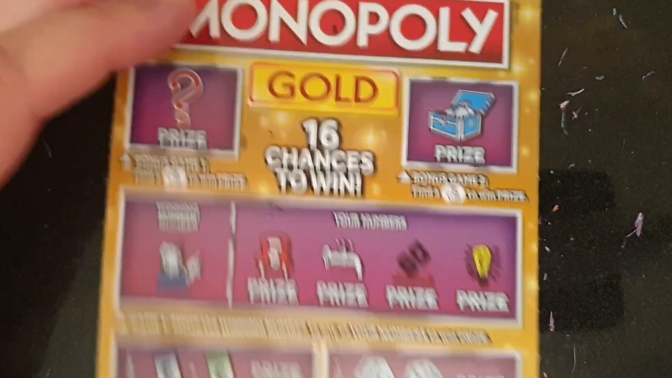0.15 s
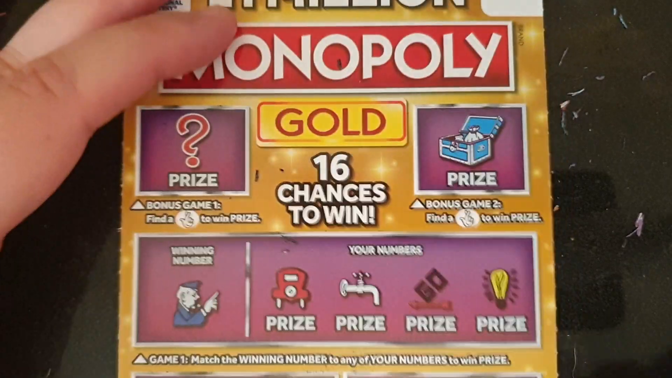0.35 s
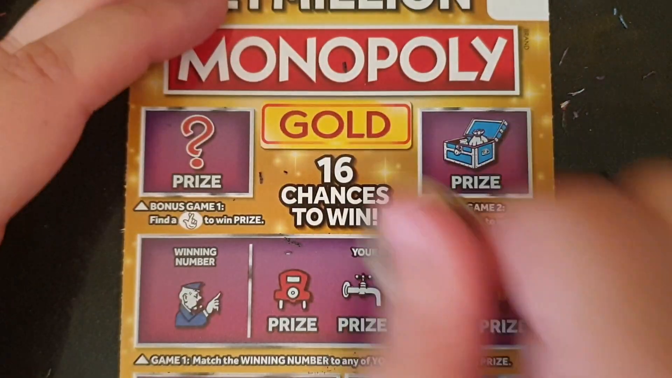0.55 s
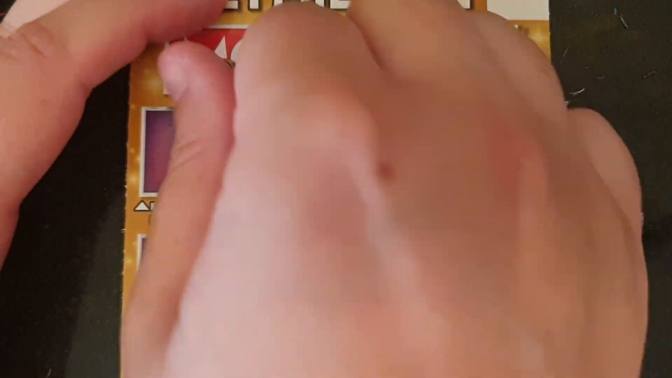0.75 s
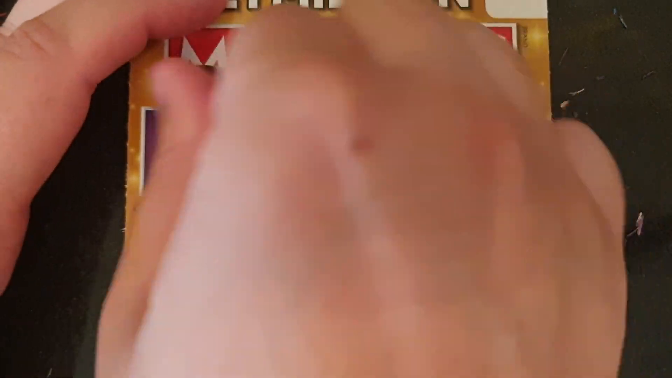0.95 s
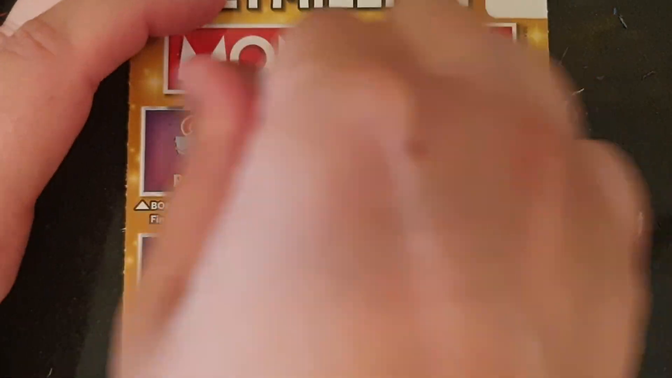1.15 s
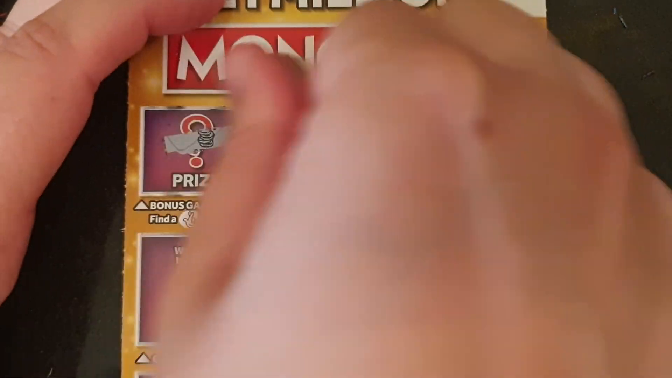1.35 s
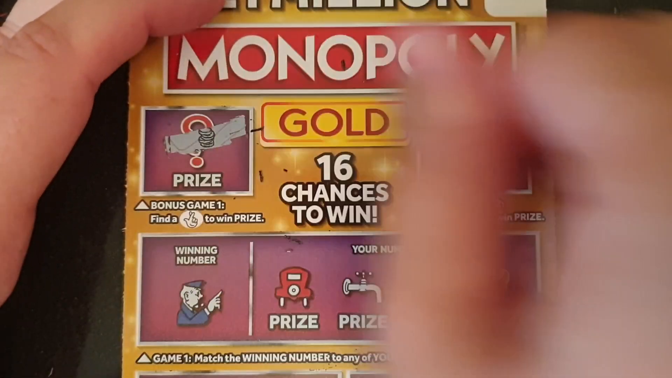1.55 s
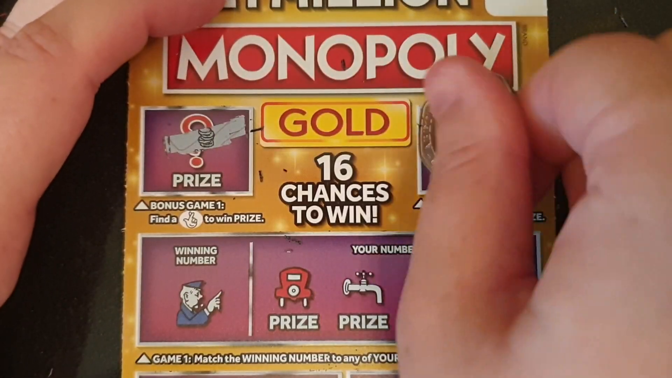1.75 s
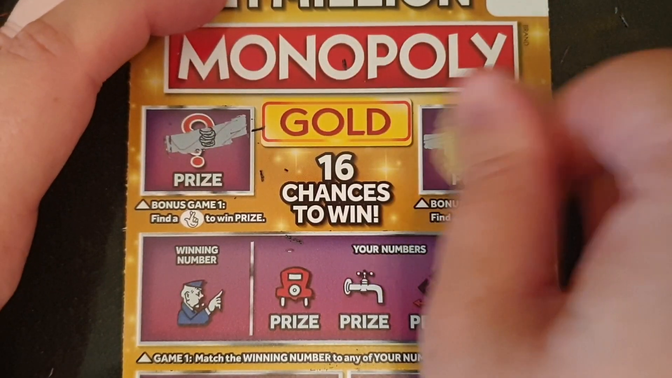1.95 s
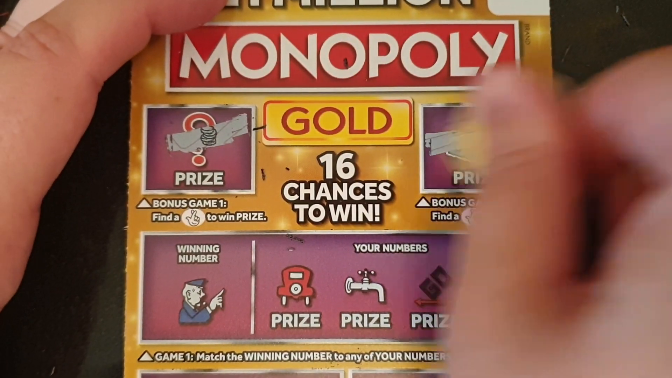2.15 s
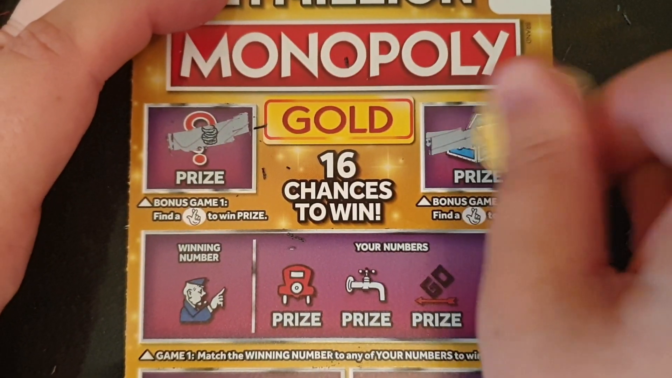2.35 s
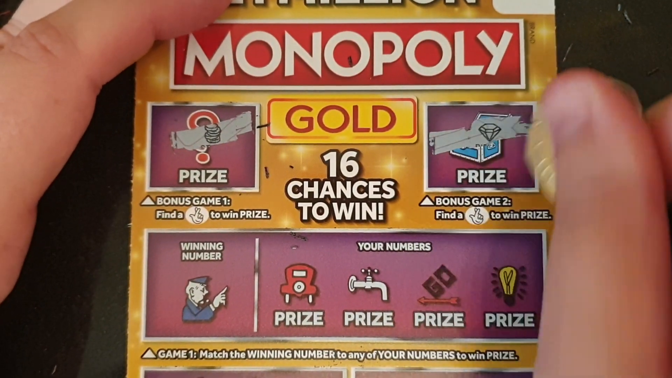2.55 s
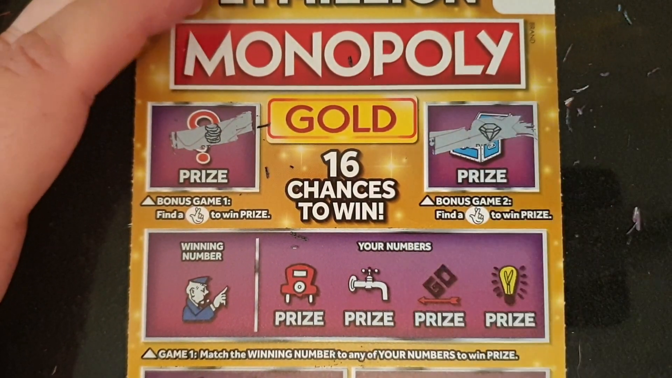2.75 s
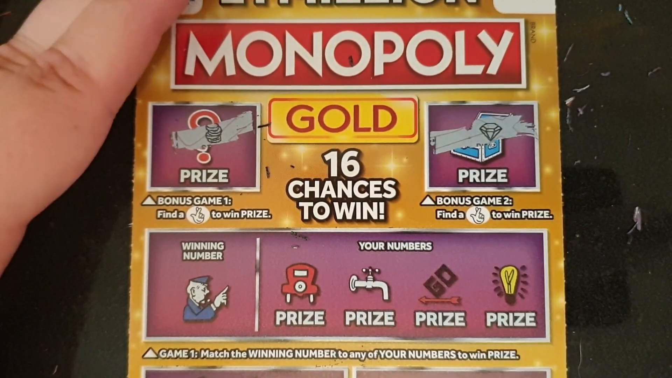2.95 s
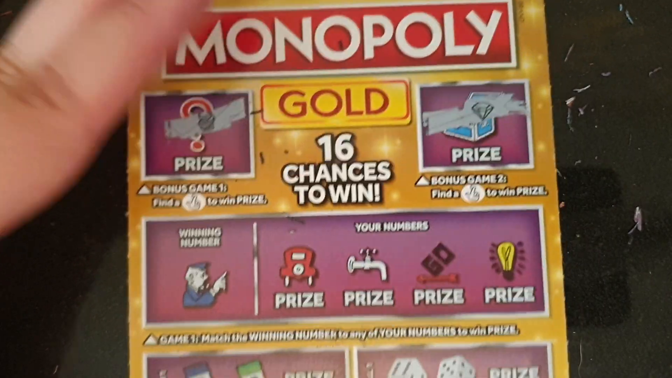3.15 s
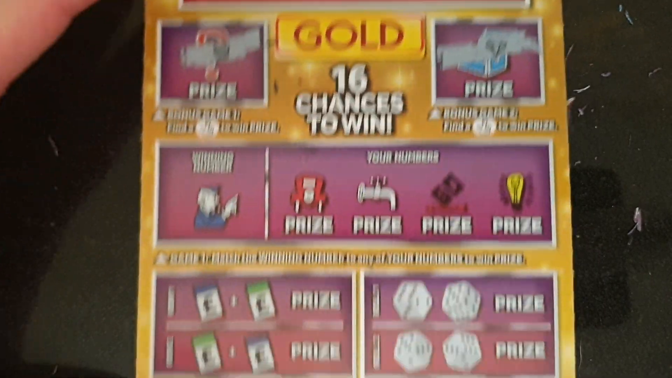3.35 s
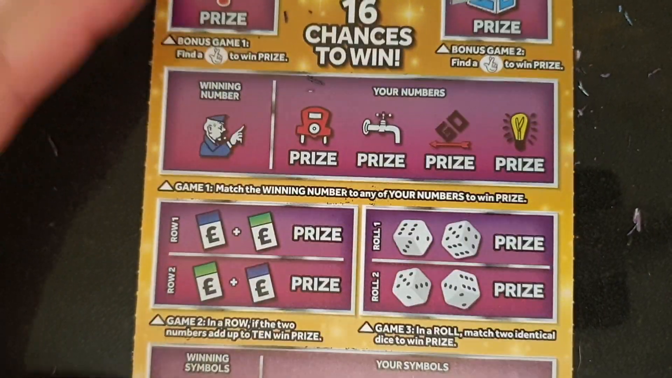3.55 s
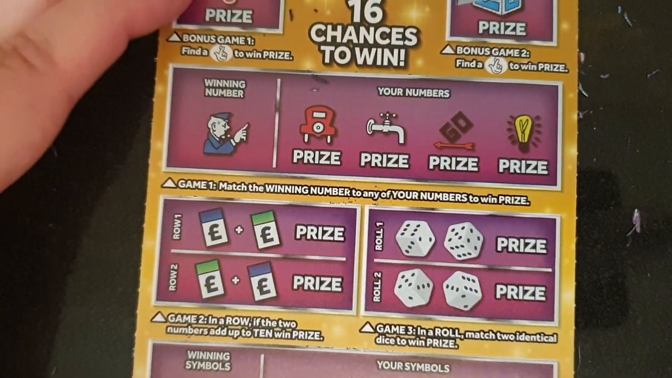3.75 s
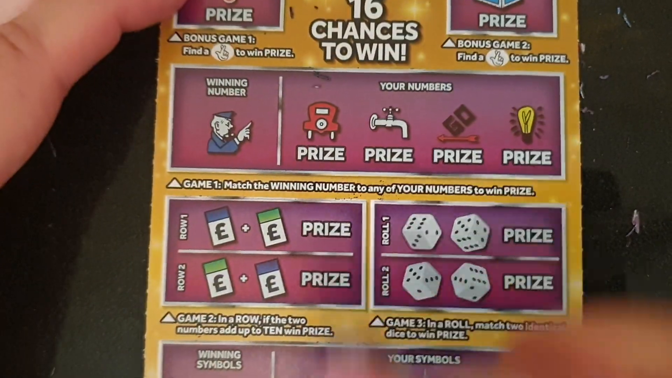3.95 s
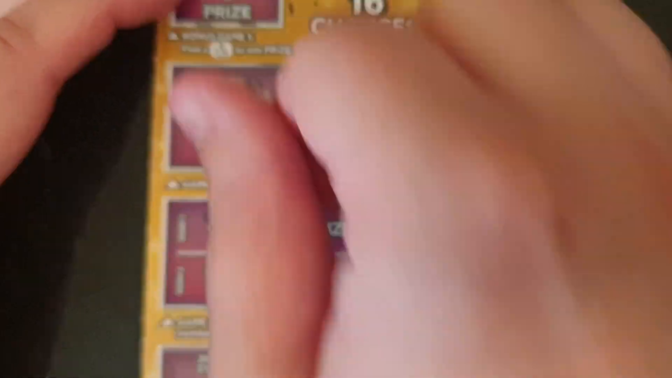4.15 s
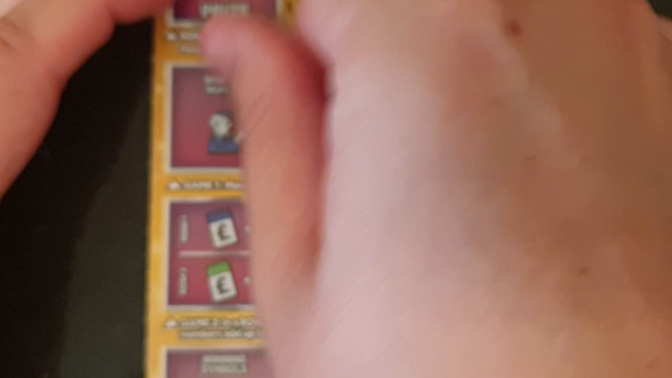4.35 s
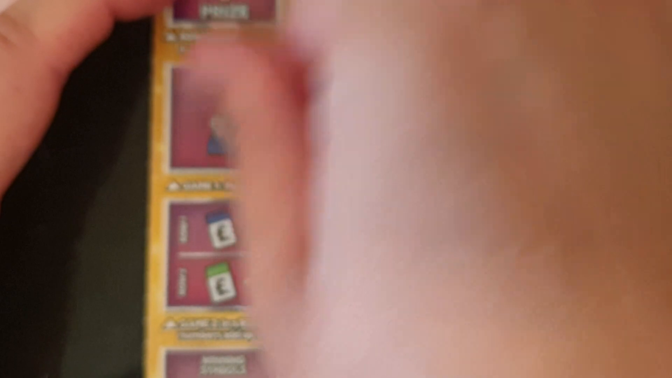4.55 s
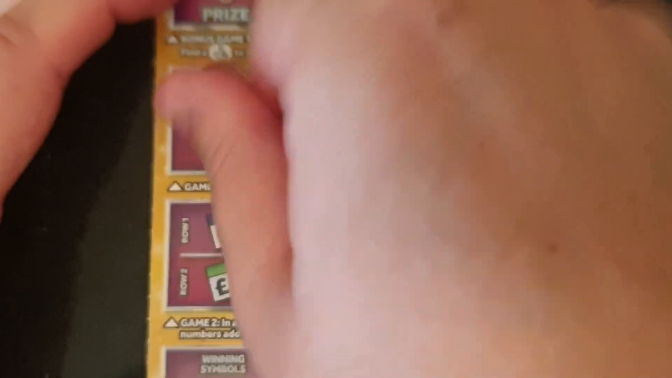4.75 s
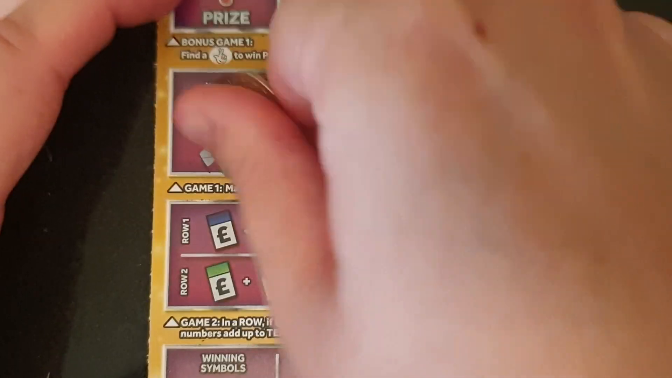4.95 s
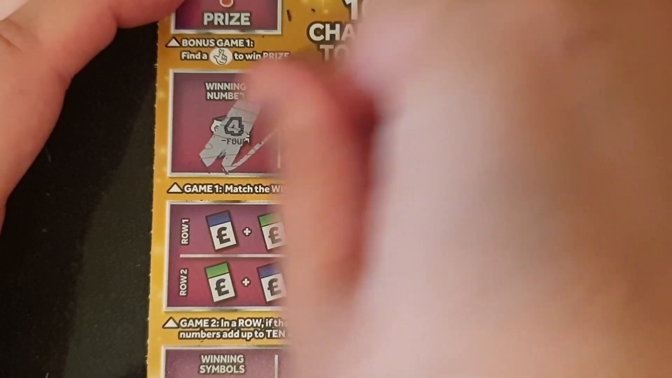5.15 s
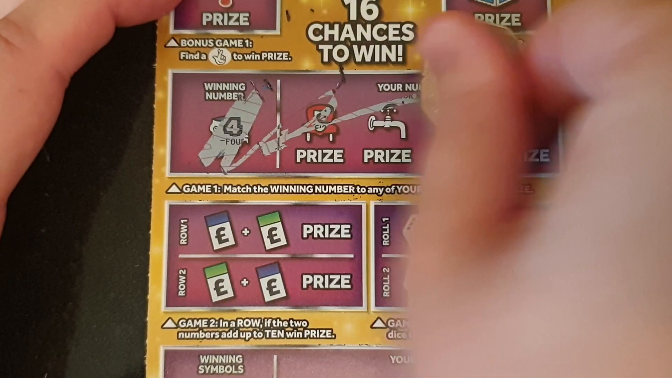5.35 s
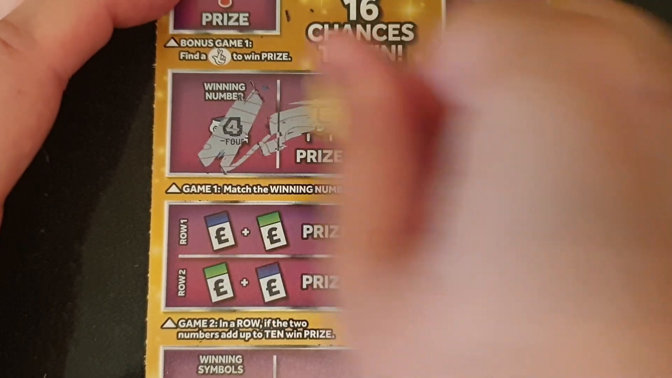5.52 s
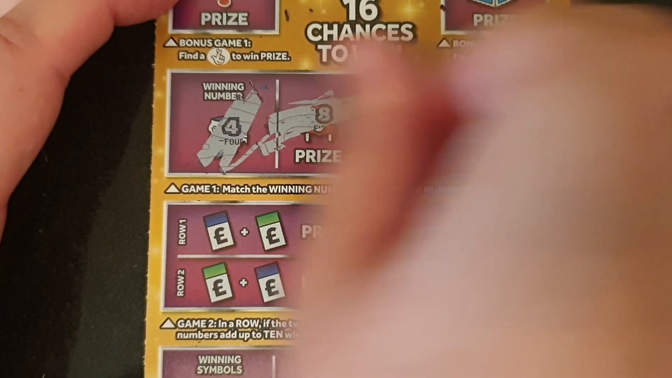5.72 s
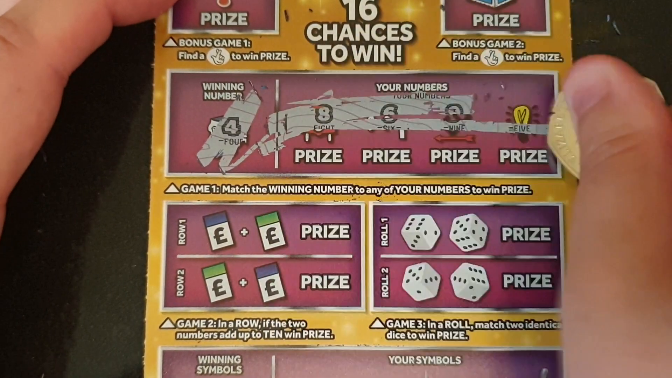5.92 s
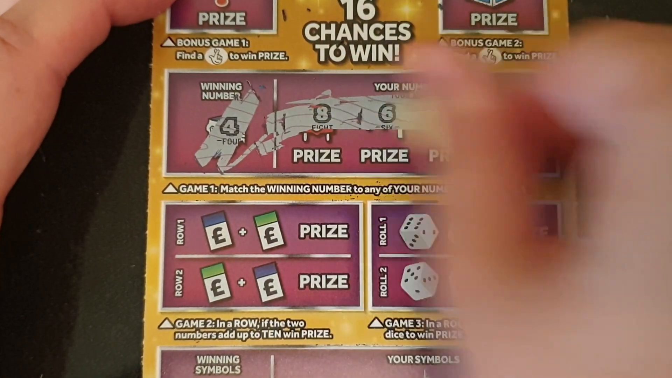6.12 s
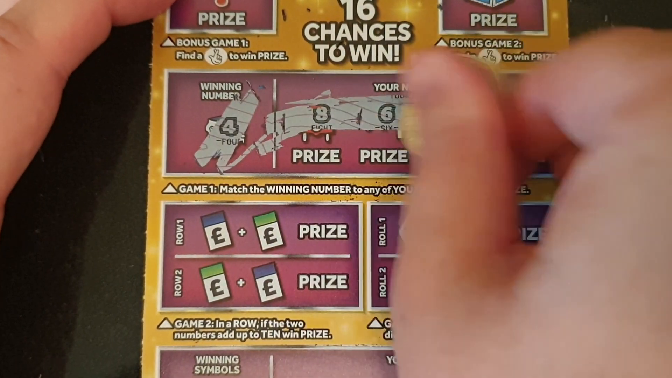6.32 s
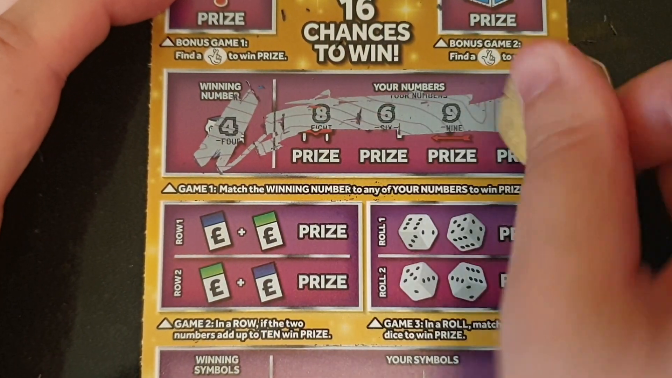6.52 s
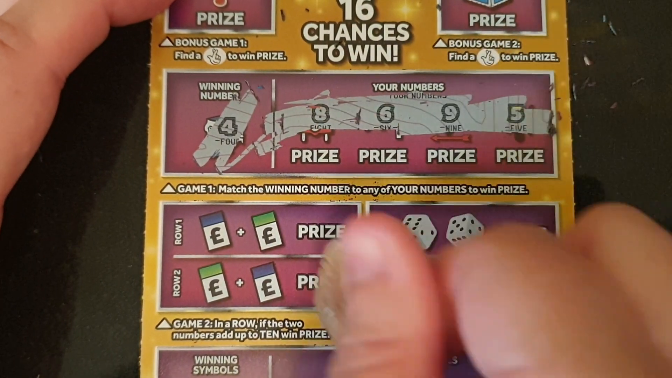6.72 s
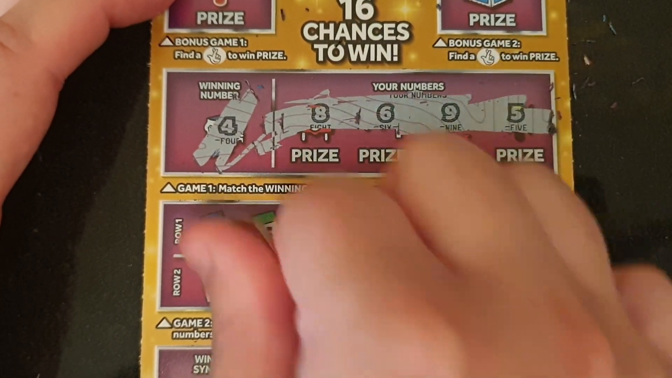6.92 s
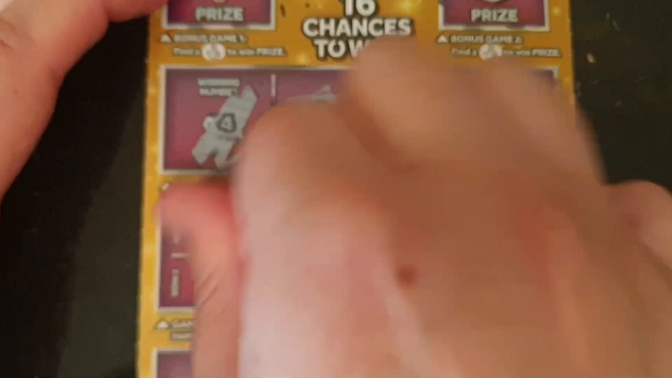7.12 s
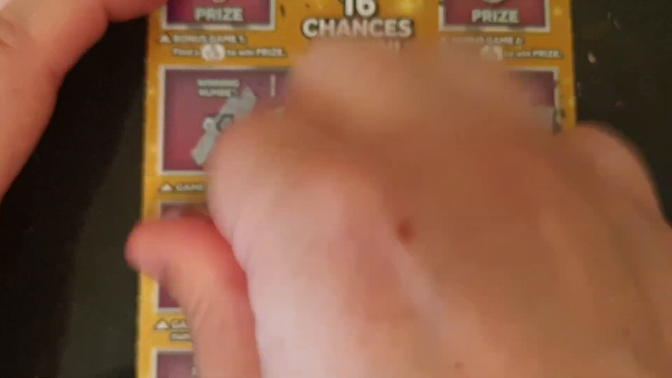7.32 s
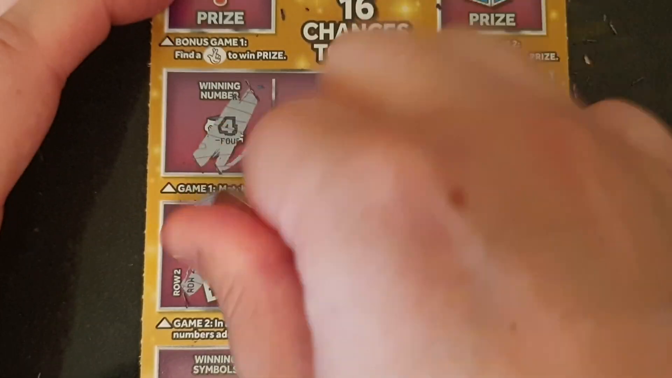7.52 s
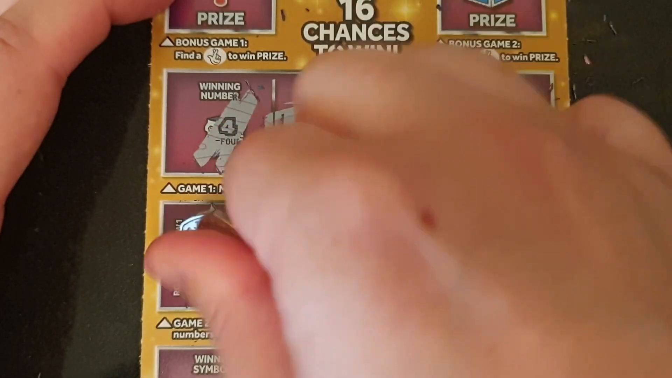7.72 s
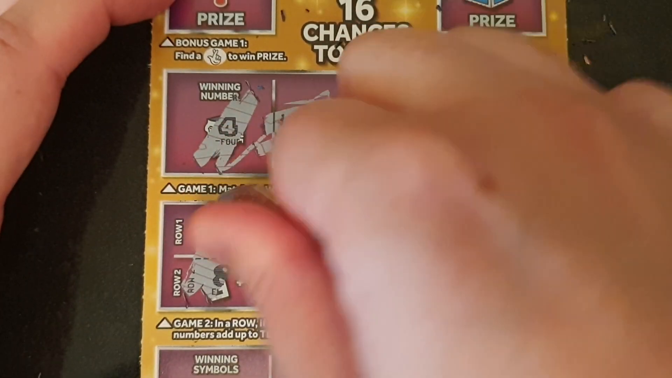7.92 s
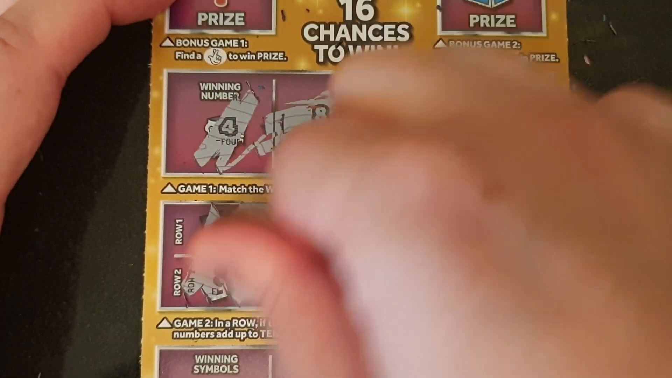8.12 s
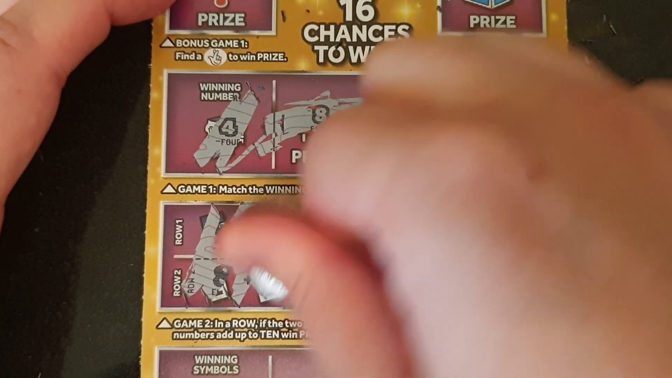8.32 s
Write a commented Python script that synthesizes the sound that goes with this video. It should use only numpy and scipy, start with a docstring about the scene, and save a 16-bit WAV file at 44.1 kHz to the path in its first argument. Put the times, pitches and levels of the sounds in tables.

```python
"""Quiet room air and a soft desk rumble come first; then a card whispers over a hard desk, close to the microphone.
A coin is set down with a knock and scrapes the card's latex off in four bouts of pushes and pulls.
Its force is gritty noise of uneven crumbs, filtered by ringing modes of coin, card and desk.
Knocks are decaying bursts through the same modes, and snags are shrill bursts of resonant noise.
The card slides before the first bout and again between the second and third; the working hand sways the desk."""
import sys
import numpy as np
from scipy import signal
from scipy.fft import rfft, irfft
from scipy.io import wavfile

SR = 44100
rng = np.random.default_rng(int(sys.argv[2]) if len(sys.argv) > 2 else 0)


def log_audio(samples):
    """Write samples as a 16-bit WAV file to the path given in sys.argv[1]."""
    # one column per channel
    frames = np.atleast_2d(samples).T
    # limit to full scale, then quantise
    limited = np.clip(frames, -1, 1)
    pcm = np.round(limited * 32767).astype(np.int16)
    wavfile.write(sys.argv[1], SR, pcm)


N = 373968


def from_db(db):
    """Amplitude gain for a level in dB."""
    return 10 ** (np.asarray(db) / 20)


def rms_one(x):
    """Scale a signal to an RMS of 1."""
    return x / np.sqrt(np.mean(x ** 2) + 1e-20)


def seconds(count):
    """Time of each sample."""
    return np.arange(count) / SR


def add(out, s, sound):
    """Mix a sound in from time s, cut off at the end of the scene."""
    at = round(s * SR)
    out[:, at:at + sound.shape[-1]] += sound[:, :max(0, N - at)]


def pan_gains(pan_db):
    """Left and right gain for a left-right level difference in dB."""
    return from_db(pan_db * np.array([[.5], [-.5]]))


def band(x, low_hz, high_hz, order=3):
    """Keep what lies between two frequencies."""
    return signal.sosfilt(signal.butter(order, [low_hz, high_hz], "band", fs=SR, output="sos"), x)


def resonate(x, hz, width_hz):
    """A resonance with gain 1 on top."""
    return signal.lfilter(*signal.iirpeak(hz, hz / width_hz, fs=SR), x)


def damped_mode(x, hz, width_hz, skirt):
    """A mode with steeper flanks: a resonance followed by one that is skirt times as wide."""
    return resonate(resonate(x, hz, width_hz), hz, skirt * width_hz)


def lift(x, hz, width_hz, db):
    """A resonance that stands db above the rest of the sound."""
    return x + (from_db(db) - 1) * resonate(x, hz, width_hz)


def colour(x, hz, db):
    """Causal (minimum-phase) filter with the given spectrum."""
    size = x.shape[-1]
    bin_hz = np.arange(size // 2 + 1) * SR / size
    bin_db = np.interp(np.log(bin_hz + 1), np.log(hz), db)
    cepstrum = irfft(np.log(from_db(bin_db)), size)
    # folding the cepstrum onto positive time puts the energy as early as possible
    cepstrum[1:size // 2] *= 2
    cepstrum[size // 2 + 1:] = 0
    return irfft(rfft(x) * np.exp(rfft(cepstrum)), size)


def stereo_noise(side_db):
    """White noise shared by both sides, plus opposed noise at side_db against it."""
    mid, side = rng.standard_normal((2, N))
    return mid + from_db(side_db) * side * [[1], [-1]]


def tail(t60, count):
    """Dense stereo reflections that die away by 60 dB in t60 seconds; energy 1 a side."""
    dying = rng.standard_normal((2, count)) * from_db(-60 * seconds(count) / t60)
    return rms_one(dying) / np.sqrt(count)


def arch(t, start, end, crest, rise_power, fall_power):
    """Swell to a crest at that share of the length and die away; a low power makes that flank steep."""
    top = start + crest * (end - start)
    phase = np.interp(t, [start, top, end], [0, .5, 1])
    return np.abs(np.sin(np.pi * phase)) ** np.where(t < top, rise_power, fall_power)


# spectrum of the room air, before the bass trim: (frequency [Hz], relative density [dB per Hz])
AIR_COLOUR = [(15, -41), (25, -11), (92, 1), (117, -4), (190, -22), (384, -28), (531, -30), (796, -35),
              (1100, -34), (2280, -36), (5880, -46), (12500, -39), (16000, -42)]
AIR_DB = -81   # RMS level of the mid between 300 Hz and 16 kHz


def air(bass_trim_db=-13.0):
    """Steady room noise, more alike at both ports in the bass than above it."""
    opposed = band(rng.standard_normal(N), 870, 16000, order=1) * from_db(2.0) * [[1], [-1]]
    noise = stereo_noise(side_db=-3.5) + opposed
    hz, db = np.transpose(AIR_COLOUR)
    noise = colour(noise, hz, db + bass_trim_db * (hz < 200))
    return from_db(AIR_DB) * noise / np.std(band(noise.mean(axis=0), 300, 16000))


def room(x, wet_db=-12.0, t60=0.23):
    """A faint, short reverberation fills the turns between strokes."""
    reflections = signal.fftconvolve(x, tail(t60, count=20000), axes=1)[:, :N]
    return x + from_db(wet_db) * reflections


# four bouts of rubbing, each a list of strokes that starts with a push and then alternates with pulls;
# level and brightness come before the colouring by direction and place:
# (start [s], length [s], level [dB], brightness [dB])
BOUTS = [
    [(0.962, 0.088, -64.5, -1.5), (1.067, 0.093, -59.5, 5), (1.18, 0.1, -59.5, 3.5),
     (1.295, 0.092, -59, -8.5), (1.4, 0.096, -61.5, 3), (1.49, 0.077, -75, -21.5)],
    [(1.78, 0.057, -69, -5.5), (1.855, 0.092, -52.5, 4.5), (1.98, 0.079, -58, 6), (2.066, 0.1, -55.5, -1.5),
     (2.175, 0.098, -57.5, 1), (2.272, 0.1, -56.5, -5.0), (2.378, 0.072, -61, -0.5),
     (2.467, 0.12, -59.5, 4.5)],
    [(4.387, 0.099, -63.5, -0.5), (4.484, 0.091, -58, -2.5), (4.578, 0.098, -59.5, 2.5),
     (4.66, 0.093, -59.5, 4), (4.772, 0.088, -58, -3), (4.85, 0.094, -59.5, -6.5), (4.936, 0.097, -59, 8),
     (5.02, 0.12, -56, -0.5), (5.165, 0.1, -55.5, 2), (5.25, 0.15, -54, 4), (5.41, 0.12, -53, 2.5),
     (5.52, 0.21, -52, 3), (5.706, 0.12, -54, -4), (5.836, 0.18, -52, 5.5), (5.999, 0.15, -53, 3),
     (6.155, 0.13, -54, 2), (6.3, 0.12, -55, 0.0), (6.425, 0.12, -55, -2.5)],
    [(6.995, 0.097, -69.5, -5.5), (7.06, 0.056, -71, -6.5), (7.152, 0.083, -60, 0), (7.228, 0.097, -60, 1),
     (7.335, 0.089, -56.5, 4.5), (7.41, 0.11, -55.0, 5.5), (7.522, 0.09, -56.5, 7),
     (7.624, 0.086, -57.5, -4.5), (7.718, 0.083, -52.5, 0.5), (7.812, 0.083, -56.0, 1),
     (7.905, 0.084, -54.5, 5), (7.988, 0.099, -56.5, 5), (8.093, 0.096, -55, 5.5), (8.178, 0.1, -56, -0.5),
     (8.283, 0.095, -52.5, 3.5), (8.375, 0.093, -58.5, 8)],
]


def strokes():
    """Every stroke as (start s, end s, level dB, brightness dB, way: 0 push or 1 pull)."""
    return [(start, start + length, db, brightness_db, k % 2)
            for bout in BOUTS
            for k, (start, length, db, brightness_db) in enumerate(bout)]


# path of the coin over the card: (time [s], place [0 by the holding hand at the left edge to 1 at the right])
COIN_PATH = [(.8, 0.035), (1.55, 0.033), (1.75, 1), (2.6, 1), (4.3, 0.28), (5.05, 0.24), (5.25, 1),
             (6.55, 0.73), (6.95, .05), (7.75, 0.51), (8.48, 1)]


def across_card(s):
    """The coin's place between the left edge (0) and the right edge (1)."""
    return np.interp(s, *np.transpose(COIN_PATH))


# left-right balance with the coin at either edge: (left edge [dB], right edge [dB])
EDGE_PAN_DB = [-0.5, 2.5]


def balance(s):
    """Left and right gain for the coin's place on the card."""
    return pan_gains(np.interp(across_card(s), [0, 1], EDGE_PAN_DB))


# when the coin moves on: (start of the middle row [s], start of the bottom row [s])
ROW_CHANGES_S = [3.5, 6.8]
# hiss by row: (top [dB], middle [dB], bottom [dB])
ROW_HISS_DB = [-6, 0.6, -1.3]
# change from the left edge to the right: (thrum [dB], honk [dB], rasp [dB], hiss [dB])
ACROSS_DB = [1, -10.5, -0.5, 3.5]
# tilt per dB of brightness: (thrum [dB], honk [dB], rasp [dB], hiss [dB])
BRIGHTNESS_SHARES = [-.52, -0.39, 0.57, 0.5]


def register_levels(s, db, brightness_db, contact_db):
    """Thrum, honk, rasp and hiss in dB, from the contact, its brightness and the coin's place on the card."""
    row_hiss_db = ROW_HISS_DB[np.searchsorted(ROW_CHANGES_S, s)]
    place_db = across_card(s) * np.array(ACROSS_DB) + [0, 0, 0, row_hiss_db]
    return db + np.array(contact_db) + place_db + brightness_db * np.array(BRIGHTNESS_SHARES)


# shudder of a firm stroke: (push [dB], pull [dB])
SHUDDER_DB = [-53.5, -60]
FIRM_STROKE_DB, SHUDDER_GROWTH = -52.5, 1.2   # level of a firm stroke; dB of shudder per dB of stroke
SHUDDER_REST_DB, SHUDDER_LAG_S = -75, .035   # the resting hand; delay after the coin bears down
SHUDDER_KNOCK_DB, SHUDDER_FADE_S = -15, 0.097   # against the knock's thrum; time constant of the decay


def shudder_drive(count=12000):
    """Strokes, above all pushes, and knocks shake the desk; the resting hand keeps it faintly astir."""
    power = np.full((1, N), from_db(SHUDDER_REST_DB) ** 2)
    for start, end, db, _, way in strokes():
        t = start + seconds(round((end - start) * SR))
        swell = arch(t, start, end, crest=0.24, rise_power=.8, fall_power=0.73)
        shudder_db = SHUDDER_DB[way] + SHUDDER_GROWTH * (db - FIRM_STROKE_DB)
        add(power, start + SHUDDER_LAG_S, (from_db(shudder_db) * swell[None]) ** 2)
    t = seconds(count)
    jolt = np.exp(-t / SHUDDER_FADE_S) * np.minimum(t / .008, 1)   # 8 ms onset
    for s, db, brightness_db, _ in KNOCKS:
        thrum_db = register_levels(s, db, brightness_db, KNOCK_DB)[0]
        add(power, s, (from_db(thrum_db + SHUDDER_KNOCK_DB) * jolt[None]) ** 2)
    return np.sqrt(power[0])


# how hard the arms sway the desk, before the sway trim: (time [s], level [dB])
SWAY = [(0.0, -67), (0.35, -66), (1.0, -72.5), (1.28, -61), (1.7, -70.5), (2.06, -52.5), (2.25, -60),
        (2.9, -66.5), (4.2, -63), (5.3, -60), (5.52, -52), (5.8, -50.5), (5.92, -61.5), (6.8, -60),
        (7.38, -53.5), (7.6, -59.5), (7.82, -54), (8.48, -59.5)]
# lowest desk modes, moved by the sway: (frequency [Hz], width [Hz], relative level [dB])
SWAY_MODES = [(49.4, 14, -3), (68, 8.6, 5.5), (88.56, 9, 6)]
# next desk modes up, moved by the shudder: (frequency [Hz], width [Hz], relative level [dB])
SHUDDER_MODES = [(146.2, 20.5, -1.5), (195, 29.3, -9), (266, 43, -11.5)]


def rumble(sway_trim_db=1.0, pan_db=3.0):
    """The hand's uneven push keeps the desk's low modes moving."""
    out = np.zeros((2, N))
    sway = from_db(np.interp(seconds(N), *np.transpose(SWAY)) + sway_trim_db)
    for modes, drive in ((SWAY_MODES, sway), (SHUDDER_MODES, shudder_drive())):
        push = stereo_noise(side_db=-11.5)
        moving = sum(from_db(db) * rms_one(damped_mode(push, hz, width_hz, skirt=3))
                     for hz, width_hz, db in modes)
        out += drive * rms_one(moving)
    return out * pan_gains(pan_db)


def grip(count, rate_hz, depth_db):
    """Contact catches and slips: an uneven gain of RMS 1, drawn anew rate_hz times a second."""
    steps = seconds(count) * rate_hz
    points = int(steps[-1]) + 2
    wander = np.interp(steps, np.arange(points), rng.standard_normal(points))
    return rms_one(from_db(depth_db * wander))


# the card slides on the desk: (start [s], length [s], level at the crest, before grip and pan [dB])
SLIDES = [(0.13, 0.2, -70.5), (0.21, 0.065, -60), (3.113, 0.047, -62), (3.147, 0.49, -64.5),
          (3.903, 0.26, -77)]
# spectrum of the slide, before its band limits: (frequency [Hz], relative density [dB per Hz])
SLIDE_COLOUR = [(1760, -36), (3000, -9), (3680, -24.5), (5800, -22), (7150, -14.5), (7890, -4.5),
                (8640, -2), (12400, -5), (16000, -19)]
SLIDE_CREST, SLIDE_FLANK_POWER = 0.55, 0.69   # share of the length; a low power gives a flat top


def sliding(pan_db=6.0):
    """The card's smooth back whispers over the desk."""
    t = seconds(N)
    gain = np.zeros(N)
    for start, length, db in SLIDES:
        swell = arch(t, start, start + length, SLIDE_CREST, SLIDE_FLANK_POWER, SLIDE_FLANK_POWER)
        gain += from_db(db) * swell
    whisper = colour(stereo_noise(side_db=-1.0), *np.transpose(SLIDE_COLOUR))
    whisper = rms_one(band(whisper, 4500, 17000, order=2))
    return gain * whisper * grip(N, rate_hz=260, depth_db=1.5) * pan_gains(pan_db)


# an edge of coin or card snags and lets go with a shrill snap; swell and fade are time constants:
# (time [s], level at the peak, before pan [dB], centre [Hz], width [Hz], swell [s], fade [s])
SNAGS = [(.431, -68, 10000, 5000, .0005, .003), (2.7505, -32, 12000, 5000, 0.0004, 0.0012),
         (3.163, -55.5, 10000, 6000, 0.00041, 0.0032), (3.8302, -43.5, 7600, 7000, 0.00042, 0.00079),
         (3.834, -61.5, 5500, 890, 0.0026, 0.024), (5.6371, -24.5, 8340, 900, 0.0036, 0.0028),
         (5.641, -38.5, 10500, 4000, .008, .009), (6.2145, -29, 9700, 4800, 0.00077, 0.0047),
         (6.236, -36, 10000, 5000, 0.0034, 0.0068), (6.564, -56, 9000, 6060, .0005, 0.0019),
         (8.243, -43, 10000, 6000, .0005, 0.0025)]


def snags(pan_db=1.5):
    """Edges snag and snap: short shrill bursts that swell and fade exponentially."""
    out = np.zeros((2, N))
    rub = band(stereo_noise(side_db=-3.0), 3500, 17000, order=2)
    for s, db, hz, width_hz, swell_s, fade_s in SNAGS:
        t = seconds(N) - s
        envelope = np.exp(np.maximum(np.minimum(t / swell_s, -t / fade_s), -20))
        out += from_db(db) * envelope * rms_one(resonate(rub, hz, width_hz))
    return out * pan_gains(pan_db)


# modes of coin, card and desk, before finger damping and contact luck:
# (frequency [Hz], width [Hz], prominence on the top, middle and bottom row [dB, dB, dB], left-right [dB])
RESONANCES = [(477, 37, 11.5, 10.5, 6, -2.5), (559.3, 54, 16, 15, 10, 8.5), (760, 40, 3.5, 3, -3.5, 0.5),
              (930.2, 30, 31, 28.5, 19, -1.5), (1050, 70.0, -0.5, 1.5, -15, 6), (1331, 92, 4, 9, 5.5, 1.5),
              (1406.5, 50, 16.5, 9.5, 15, -7.5), (1874, 720, 9.5, 4, 0.5, 0),
              (2020, 120, 11.5, 6.5, 2, -7.5), (2390, 46, 6.5, 4.5, 20.5, -5),
              (2646, 28.2, 26, 22.5, 14.5, 7), (2941, 58, 14.5, 14.5, 19, 2.5), (3220, 47, 9.5, 2.5, 4, 2),
              (4232, 38, 11.5, 8, 4, -18), (4284, 18, 16.5, 17, 21.5, 2), (4520, 21, 0, 10.5, 10, -1.5),
              (4690, 12, 6, -1, -4, -4), (4740, 30.0, 17, 9, 17, -0.5), (5500, 12, 9, 5, 10, 11.5),
              (5817, 12, 23.5, 23.5, 23.5, -6), (6400, 31, 4, -7, 1, 1), (6770, 26, 15.5, 4, 14, -2),
              (7520, 35, 15, 16, 24, -2), (7730, 40, 8.5, 10.5, 2, 0.5), (8180, 86, -6, 7.5, -5, -3),
              (8340, 52, 22, -1, 11, -2), (9930, 76, 3, 1, -4, 8.5), (12800, 62, 4.5, -8, -15, 1)]
# response between the modes: (frequency [Hz], level [dB], left-right [dB])
BROAD_COLOUR = [(292, -0.5, -1.5), (400.0, -9.5, 7.5), (505, -5.5, -4.5), (1040, 0, -1), (1680, -4, 2),
                (2930, -5.5, 1.5), (3630, -4.5, 3), (5300, -4.5, 3.5), (7070, -18, 3), (8040, -8, 8.5),
                (9950, -9.5, 6.5), (13270, -10.5, 3), (16200, -31.5, 26)]
FINGER_DAMPING_HZ = 3.5   # the gripping fingers widen every mode by this much


def desk_response(s, strength_spread_db=1.5, scatter_t60=0.03, turn_hz=1560, turn_width_hz=520, count=4096):
    """A click on the card at the microphone's two ports; each new contact weights the modes anew."""
    row = np.searchsorted(ROW_CHANGES_S, s)
    # treble bounces between hand and desk
    scattered = signal.unit_impulse(count) + band(tail(scatter_t60, count), 2500, 20000, order=1)
    contact_db = strength_spread_db * rng.standard_normal(len(RESONANCES))
    hz, level_db, pan_db = np.transpose(BROAD_COLOUR)
    ports = []
    for x, side in zip(scattered, (.5, -.5)):
        x = colour(x, hz, level_db + side * pan_db)
        for (mode_hz, width_hz, *prominence_db, mode_pan_db), luck_db in zip(RESONANCES, contact_db):
            sensitivity = min(mode_hz / 2500, 1)   # long bending waves hardly notice where the coin touches
            mode_db = prominence_db[row] + side * mode_pan_db + sensitivity * luck_db
            x = lift(x, mode_hz, width_hz + FINGER_DAMPING_HZ, mode_db)
        ports.append(x)
    # around turn_hz the desk moves in opposite phase at the two ports
    ports[0] = ports[0] - 2 * resonate(ports[0], turn_hz, turn_width_hz)
    return np.array(ports)


# borders of thrum, honk, rasp and hiss, from low to high: (frequency [Hz])
REGISTER_EDGES_HZ = [330, 1150, 1700, 6500, 16500]


def registers(response):
    """Split a response into thrum, honk, rasp and hiss, each with a mid of energy 1."""
    edges = zip(REGISTER_EDGES_HZ, REGISTER_EDGES_HZ[1:])
    parts = [band(response, low, high, order=4) for low, high in edges]
    return [part / np.linalg.norm(part.mean(axis=0)) for part in parts]


# the coin's edge hits the card; level and brightness come before the blow gain and the colour of place:
# (time [s], level [dB], brightness [dB], treble crack against the level [dB])
KNOCKS = [(0.8262, -48.5, -5.5, -8.5), (1.233, -62, 4, 7.5), (1.344, -58.5, 14, -3), (1.7706, -45, -8, 2),
          (2.113, -48, 7.5, -14), (2.337, -46, 4.5, -18), (2.527, -47, -2, -16), (4.3333, -49.5, -8, -1),
          (4.897, -44, 6.5, -26), (4.947, -58, -11.5, -7), (5.748, -50, -10.5, 1), (6.9793, -49, -13, -1),
          (7.668, -47.5, 11, -15), (7.762, -55, 5.5, 2.5)]
# colour of a knock: (thrum [dB], honk [dB], rasp [dB], hiss [dB])
KNOCK_DB = [0.5, 0, -3.5, -1]
THUD_DB = -10.5   # against the knock's thrum


def knocks(blow_db=30.0, crunch_db=2.0, crunch_t60=0.061, crack_t60=0.0026,
           thud_hz=550, thud_width_hz=110, count=2048):
    """The coin's edge cracks in the treble, thuds into the desk and crunches the coating for a moment."""
    out = np.zeros((2, N))
    click = signal.unit_impulse(count)
    thud = damped_mode(click, thud_hz, thud_width_hz, skirt=6)   # the desk gives way under the blow
    thud = np.array([thud, thud]) / np.linalg.norm(thud)
    decays = (crunch_t60, crunch_t60, crunch_t60, crack_t60)
    for s, level_db, brightness_db, crack_db in KNOCKS:
        levels_db = register_levels(s, level_db, brightness_db, KNOCK_DB) + [0, 0, 0, crack_db]
        add(out, s, from_db(levels_db[0] + blow_db + THUD_DB) * thud)
        for db, voice, t60 in zip(levels_db, registers(desk_response(s)), decays):
            force = click + from_db(crunch_db) * tail(t60, count)[0]
            ringing = signal.fftconvolve([force], voice, axes=1)
            ringing = ringing / np.linalg.norm(ringing.mean(axis=0))
            add(out, s, from_db(db + blow_db) * balance(s) * ringing)
    return out


def crumbs(count, per_s=3500, spread_db=4.0, smooth_db=-4.0):
    """Friction force: latex breaks off in tiny crumbs of uneven size over a smooth rub."""
    sizes = from_db(spread_db * np.minimum(rng.exponential(1, count), 4))
    kicks = sizes * rng.choice([-1, 1], count) * (rng.random(count) < per_s / SR)
    smooth_rub = from_db(smooth_db) * rng.standard_normal(count)
    return rms_one(rms_one(kicks) + smooth_rub)


# a push digs in and thrums: (thrum [dB], honk [dB], rasp [dB], hiss [dB])
PUSH_DB = [6, 4.6, -2, 0.07]
# a pull skims and rasps: (thrum [dB], honk [dB], rasp [dB], hiss [dB])
PULL_DB = [-3, 0, 4, 0.5]
# rise of the pressure, lower is more abrupt: (push [exponent], pull [exponent])
BITE_POWER = [0.61, 0.48]
# rise of the speed, lower is more abrupt: (push [exponent], pull [exponent])
SPEED_RISE_POWER = [1.43, 1.62]
PRESSURE_CREST, SPEED_CREST = [0.4, 0.49], [0.44, .54]   # share of the stroke's length: (push, pull)


def scratching():
    """Each stroke bites and tails off; pressure drives the low registers, speed the high ones."""
    out = np.zeros((2, N))
    for start, end, db, brightness_db, way in strokes():
        count = round((end - start) * SR)
        t = start + seconds(count)
        pressure = arch(t, start, end, PRESSURE_CREST[way], BITE_POWER[way], fall_power=1.9)
        speed = arch(t, start, end, SPEED_CREST[way], SPEED_RISE_POWER[way], fall_power=2.38)
        drives = (pressure, pressure, speed, speed)
        chatter = grip(count, rate_hz=420, depth_db=1.5)
        gains = from_db(register_levels(start, db, brightness_db, (PUSH_DB, PULL_DB)[way]))
        for voice, drive, gain in zip(registers(desk_response(start)), drives, gains):
            # the coin's tilt favours now one register, now another
            rocking = grip(count, rate_hz=120.4, depth_db=2.53)
            force = drive * chatter * rocking * crumbs(count)
            scrape = signal.fftconvolve([force], voice, axes=1)
            add(out, start, gain * balance(start) * scrape)
    return out


def scene():
    """Contact sounds ring in the room, over the desk's rumble and the air."""
    contacts = sliding() + snags() + knocks() + scratching()
    return air() + rumble() + room(contacts)


CUTOFF_HZ = 16300


def record(dry):
    """The top is cut steeply."""
    return signal.sosfilt(signal.ellip(10, .2, 80, CUTOFF_HZ, fs=SR, output="sos"), dry)


dry = scene()
out = record(dry)
log_audio(out)
```